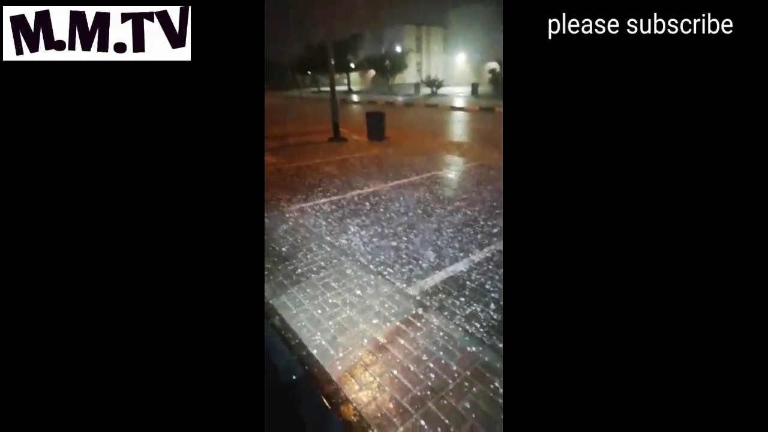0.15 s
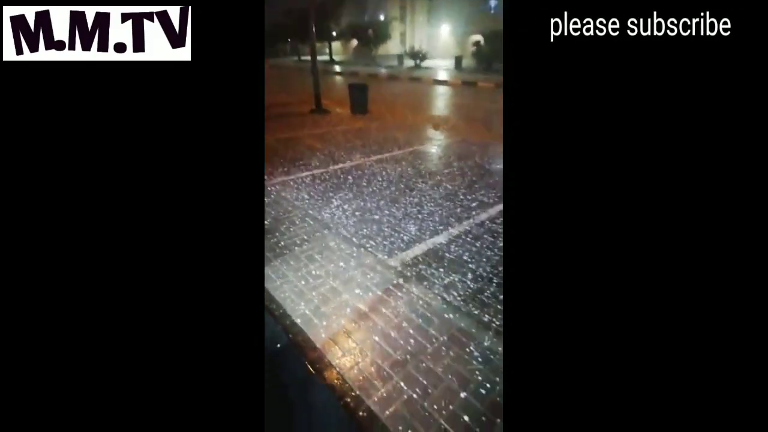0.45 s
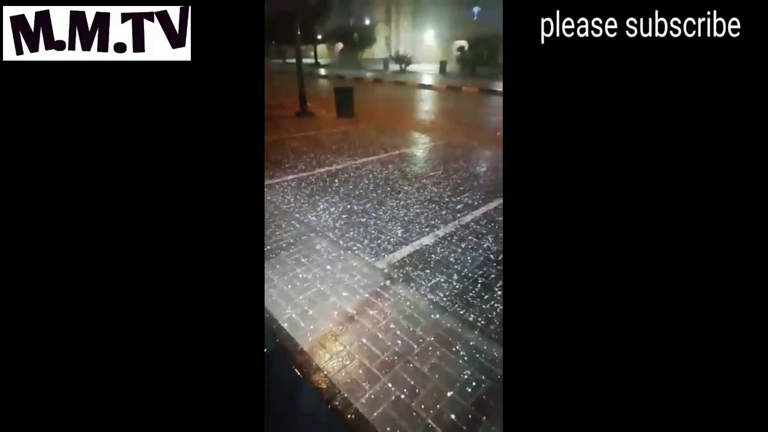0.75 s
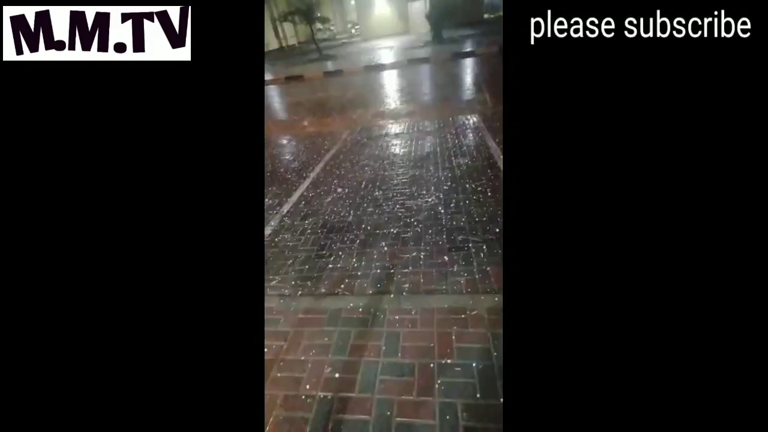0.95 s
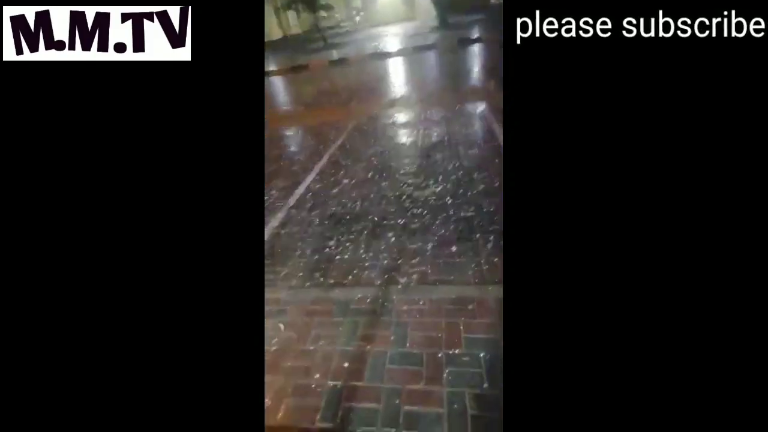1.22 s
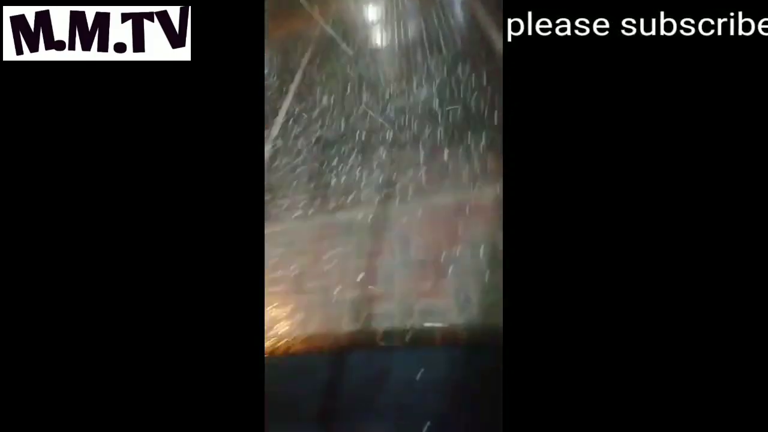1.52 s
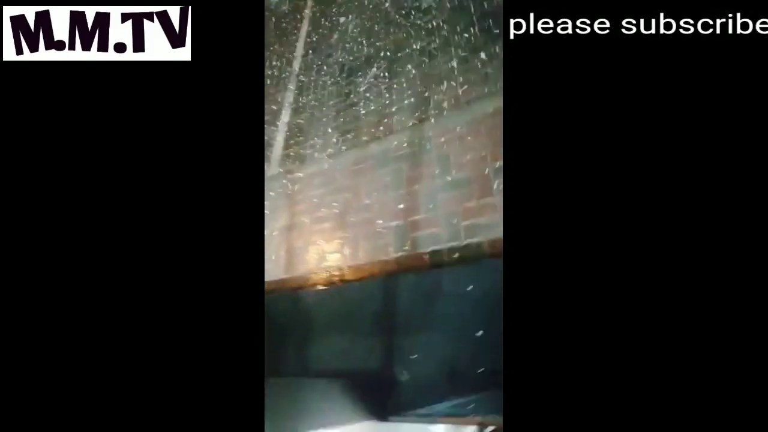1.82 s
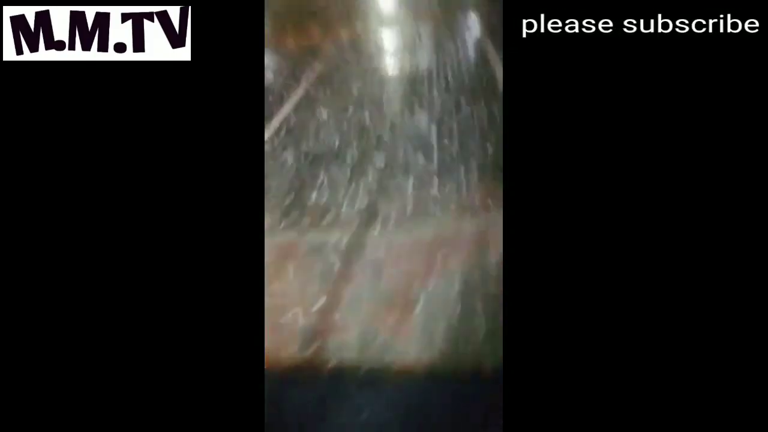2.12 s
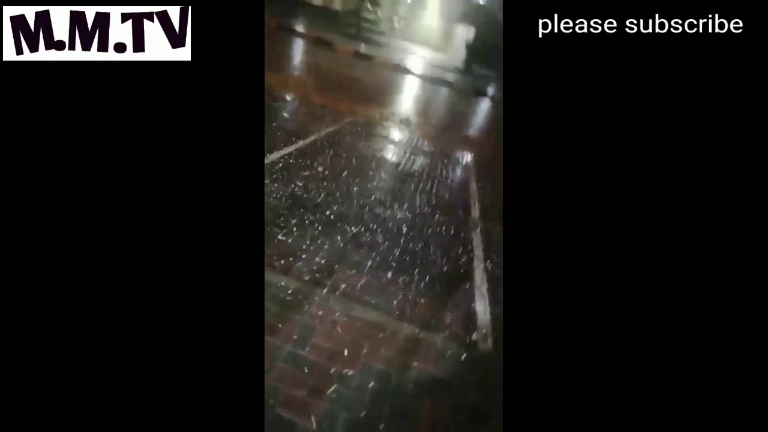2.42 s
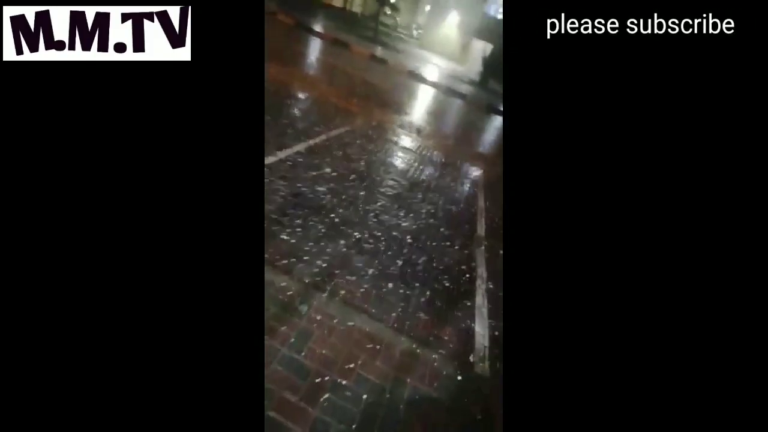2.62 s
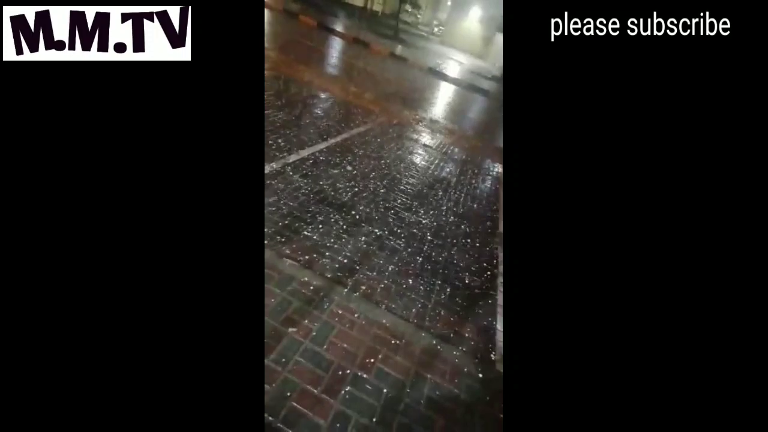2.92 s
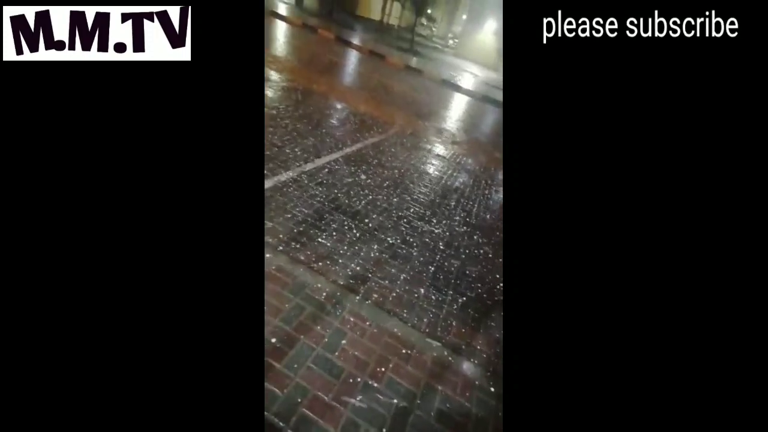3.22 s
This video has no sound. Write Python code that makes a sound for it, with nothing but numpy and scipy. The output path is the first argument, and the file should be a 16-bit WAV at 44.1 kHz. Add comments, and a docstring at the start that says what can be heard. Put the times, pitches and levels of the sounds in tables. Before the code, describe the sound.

A hailstorm hisses steadily on outdoor brick paving, with stones ticking and drops plopping near the microphone. After a short, abrupt silence it resumes, with hollow knocks farther off and a low puff of wind near the end.

```python
"""Hailstorm on a car park

Hail and rain pelt the paving at night, heard from shelter on two microphones a hand's length apart.
Countless far impacts merge into a bed of roar and hiss. Nearer stones tick on the bricks, a few crack
right up close, drops plop in the wet and a hollow clatter sits farther back.
A puff of wind rumbles on the microphones, and the whole mix cuts to silence once, briefly."""
import sys
import numpy as np
from scipy import signal
from scipy.fft import rfft, irfft, next_fast_len
from scipy.io import wavfile
from scipy.ndimage import uniform_filter1d

SR = 44100
rng = np.random.default_rng(int(sys.argv[2]) if len(sys.argv) > 2 else 0)


def wav_out(sig):
    """Save sig, one row per channel (or a flat mono array), as 16-bit PCM at SR to the path in sys.argv[1]."""
    wavfile.write(sys.argv[1], SR, np.round(np.clip(np.atleast_2d(sig).T, -1, 1) * 32767).astype(np.int16))


N = 147735
TIME = np.arange(N) / SR

# fader for the far downpour below the crossover (time [s], level [dB])
ROAR_FADER = [(0,-10),(.05,-7.5),(.23,-6),(.255,-10),(.32,-7.5),(.37,-9),(.395,-10.5),(.44,-8),(.6,-6.5),(.87,-7.5),(1.29,-4.5),(1.52,-5.5),(1.76,-4.5),(1.95,-5),(2.22,-5),(2.7,-6.5),(3.17,-4),(3.34,-7)]
# fader for the downpour above the crossover; ticks and plops ride it too (time [s], level [dB])
HISS_FADER = [(0,-6),(.22,-5),(.28,-7.5),(.375,-6),(.39,-8),(.46,-6),(.62,-4.5),(.87,-7.5),(1.29,-7),(1.55,-7),(1.78,-6.5),(2.05,-8),(2.19,-6.5),(2.235,-5),(2.29,-8),(2.62,-6.5),(3.34,-7.5)]
# the roar drifts sideways as the microphones turn (time [s], left boost and right cut [dB])
ROAR_PAN = [(0,0),(.87,-0.5),(1.29,0),(1.6,0.3),(2.0,0.1),(2.3,-.6),(2.7,-0.4),(3.34,-0.7)]
# how alike the downpour is at the spaced microphones (frequency [Hz], correlation [-1 to 1])
MIC_CORRELATION = [(60,0.98),(250,0.88),(350,.6),(470,0),(620,-0.42),(950,0.28),(1450,0.47),(1950,0.2),(2400,-0.7),(2850,-0.26),(3400,0.44),(4200,-.18),(5200,0.059),(6200,-0.25),(8000,0.17)]
# cues for the closest hailstones (time [s], level before filtering [dB])
STONE_HITS = [(0.198,14),(.247,19),(0.378,22),(0.583,24),(0.723,17),(0.754,19),(.796,28),(.801,20),(1.367,15.5),(1.497,11),(1.533,18),(1.942,25),(2.093,23),(2.173,13),(2.226,25),(2.243,18),(2.512,14),(2.518,19),(2.537,16),(2.889,16),(3.238,26),(3.296,24)]
# fader for hollow knocks on surfaces farther off (time [s], level [dB])
KNOCK_FADER = [(0,-38),(.87,-31),(1.29,-19),(1.55,-21.5),(1.95,-20.5),(2.1,-25.5),(2.3,-16.5),(2.45,-19),(2.63,-17),(2.8,-20.5),(3.05,-25.5),(3.34,-22.5)]
# fader for the higher rattle of stones (time [s], level [dB])
RATTLE_FADER = [(0,-21),(.22,-26),(.26,-30),(.33,-28),(.365,-13),(.39,-31),(.58,-24.5),(.87,-29),(1.29,-32),(1.8,-23),(2.4,-26),(3.34,-23.5)]
# EQ on all the hail and rain at the left microphone (frequency [Hz], gain [dB])
LEFT_EQ = [(25,-12),(60,-10.5),(120,-4.5),(250,-5),(500,-10.5),(850,-7),(1300,-5.5),(1900,-7.5),(2350,-4),(2900,-5),(3600,-9),(4700,-9),(6300,-12.5),(7050,-18.5),(7600,-18.5),(8200,-16.5),(9100,-23.5),(9700,-15),(11000,-16),(14200,-15),(14900,-10),(15400,-17.5)]
# the same at the right microphone (frequency [Hz], gain [dB])
RIGHT_EQ = [(25,-11.5),(60,-7),(120,-5),(250,-5),(450,-7.5),(850,-7),(1200,-3),(2200,-2.5),(3150,-4),(3750,-8.5),(4900,-6),(6400,-2.5),(7000,-7),(7700,-20.5),(8200,-20.5),(9150,-18),(9900,-17.5),(11000,-25.5),(12200,-26),(13800,-28.5),(15000,-28)]
# fader for the wind on the microphones (time [s], level [dB])
WIND_FADER = [(0,-33),(.14,-33),(.35,-44.5),(2.24,-45),(2.29,-34),(2.34,-55),(2.76,-51),(2.78,-21.5),(2.82,-21),(2.86,-26.5),(2.96,-29),(3.0,-36),(3.34,-44)]
# EQ that turns noise into wind rumble (frequency [Hz], gain [dB])
WIND_EQ = [(25,-22.5),(50,-5.5),(75,1.5),(115,2),(180,-11),(400,-25.5),(1500,-69.5)]


def far_downpour(crossover_hz=4400):
    """Impacts too many to tell apart arrive from all round: a wide bed of roar and hiss."""
    size = next_fast_len(N)
    hz = np.fft.rfftfreq(size, 1 / SR)
    alike = np.clip(at_hz(MIC_CORRELATION, hz), -.99, .99)
    mid, side = rfft(rng.standard_normal((2, size)))
    bed = np.sqrt((1 + alike) / 2) * mid + np.sqrt((1 - alike) / 2) * side * [[1], [-1]]
    low_band = 1 / (1 + (hz / crossover_hz) ** 4)
    roar = irfft(bed * low_band, size)[:, :N]
    hiss = irfft(bed * (1 - low_band), size)[:, :N]
    pan = fader(ROAR_PAN) ** np.array([[1], [-1]])
    return fader(ROAR_FADER) * pan * roar + fader(HISS_FADER) * hiss


def close_stones():
    """Single stones crack on the ground right by the microphones, hotter on the left."""
    out = np.zeros((2, N))
    for time_s, db in STONE_HITS:
        hit, start = np.zeros(N), int(time_s * SR)
        crack = from_db(db) * ice_crack()
        hit[start:start + len(crack)] = crack[:N - start]
        out += place(hit, side=rng.uniform(-.77, 1), left_db=4)
    return brighten(out, hz=12000)


def hail_ticks(per_s=950, level_db=-14.5, directions=16):
    """Small stones tick crisply on the bricks nearby, from every direction."""
    out = 0
    for side in np.cos(np.linspace(0, np.pi, directions)):
        hits = impacts(per_s / directions, spread_db=6.5)
        ticks = np.convolve(hits, ice_crack())[:N]
        out += place(ticks, side, left_db=3 + 2.5 * side)
    return from_db(level_db) * normalise(brighten(out, hz=5990))


def plops(level_db=-19.5):
    """Drops and stones land in the film of water nearby, each with a short pitched ring."""
    drops = ringing_impacts(per_s=600, spread_db=2, cycles=18, band_hz=(1470, 7030), pitches=24)
    return from_db(level_db) * drops


def clatter():
    """Stones knock hollowly and rattle on surfaces farther off."""
    knocks = ringing_impacts(per_s=700, spread_db=1.5, cycles=16, band_hz=(1010, 1720), pitches=16)
    rattle = ringing_impacts(per_s=690, spread_db=.5, cycles=15, band_hz=(1650, 2163), pitches=12)
    return fader(KNOCK_FADER) * knocks + fader(RATTLE_FADER) * rattle


def wind():
    """Air buffets the microphones: a low mono rumble."""
    rumble = equalise(rng.standard_normal(N), WIND_EQ)
    return fader(WIND_FADER) * normalise(rumble)


def ice_crack(spray_gain=.22, decay_s=.00046, size=256):
    """One impact of ice: a sharp click and a dying spray of fragments; unit energy."""
    crack = spray_gain * rng.standard_normal(size) * np.exp(-TIME[:size] / decay_s)
    crack[0] = 1   # the click
    return crack / np.linalg.norm(crack)


def impacts(per_s, spread_db):
    """Random clicks, many small and a few large."""
    sizes = from_db(spread_db * np.minimum(rng.exponential(1, N), 4.2))
    polarity = rng.choice([-1, 1], N)
    return sizes * polarity * (rng.random(N) < per_s / SR)


def ringing_impacts(per_s, spread_db, cycles, band_hz, pitches):
    """Random hits ping resonators scattered left to right; each ring falls 60 dB over `cycles`."""
    out = 0
    for hz in np.geomspace(*band_hz, pitches):
        omega = 2 * np.pi * hz / SR
        radius = np.exp(-np.log(1000) * hz / (cycles * SR))
        hits = impacts(per_s / pitches, spread_db) + 1e-18 * rng.random(N)
        ring = signal.lfilter([1, 0, -1], [1, -2 * radius * np.cos(omega), radius ** 2], hits)
        out += omega * place(ring, side=np.cos(rng.uniform(0, np.pi)), left_db=rng.normal(0, 2.2))
    return normalise(out)


def flicker(x, depth_db=1.66, size=1024):
    """The level flickers at random in small patches of time and pitch."""
    cells = signal.stft(x, nperseg=size)[2]
    patches = uniform_filter1d(rng.standard_normal(cells.shape[1:]), size=3, axis=0)
    patches = uniform_filter1d(patches, size=4, axis=1)
    return signal.istft(cells * from_db(depth_db * normalise(patches)), nperseg=size)[1][:, :N]


def place(x, side, left_db, mic_lag_s=.00059):
    """Sound reaches the nearer microphone first (side 1 is left, -1 right); left_db tips the balance."""
    lead = int(side * mic_lag_s / 2 * SR)
    return np.array([from_db(sign * left_db) * np.roll(x, -sign * lead) for sign in (1, -1)])


def brighten(x, hz):
    """Gentle high-pass: a hard contact has little bass."""
    return signal.sosfilt(signal.butter(1, hz, "high", fs=SR, output="sos"), x + 1e-18)


def equalise(x, curve, size=4096):
    """Minimum-phase EQ: no pre-ringing ahead of the transients."""
    gain = from_db(at_hz(curve, np.fft.rfftfreq(size, 1 / SR)))
    cepstrum = irfft(np.log(gain))
    cepstrum[1:size // 2] *= 2
    cepstrum[size // 2 + 1:] = 0
    impulse = irfft(np.exp(rfft(cepstrum)))[:size // 2]
    return signal.fftconvolve(x, impulse)[:N]


def at_hz(curve, hz):
    """Read a table on a log-frequency axis."""
    table = np.array(curve)
    return np.interp(np.log(hz + 1), np.log(table[:, 0]), table[:, 1])


def fader(curve):
    """Gain automation from rows of (time [s], level [dB])."""
    return from_db(np.interp(TIME, *np.transpose(curve)))


def from_db(db):
    """Decibels to gain."""
    return 10 ** (np.asarray(db) / 20)


def normalise(x):
    """Scale to unit power."""
    return x / np.sqrt(np.mean(x ** 2) + 1e-20)


def scene():
    """Mix the hail and rain, EQ each microphone and lay the wind underneath."""
    near = normalise(fader(HISS_FADER)) * (hail_ticks() + plops())
    left, right = flicker(far_downpour()) + clatter() + near + close_stones()
    return np.array([equalise(left, LEFT_EQ), equalise(right, RIGHT_EQ)]) + wind()


def record(dry):
    """Clip the peaks, mute the mix for a moment and cut the top with a steep low-pass."""
    mute_from_s, mute_to_s = .878, 1.277
    tail_db, tail_s, cutoff_hz = -23, .0056, 15400
    tail = from_db(tail_db) * np.exp(-np.maximum(TIME - mute_from_s, 0) / tail_s)
    gate = np.where((TIME > mute_from_s) & (TIME < mute_to_s), tail, 1)
    low_pass = signal.ellip(12, .2, 90, cutoff_hz, fs=SR, output="sos")
    return signal.sosfilt(low_pass, np.clip(dry, -1, 1) * gate + 1e-18)


dry = scene()
out = record(dry)
wav_out(out)
```